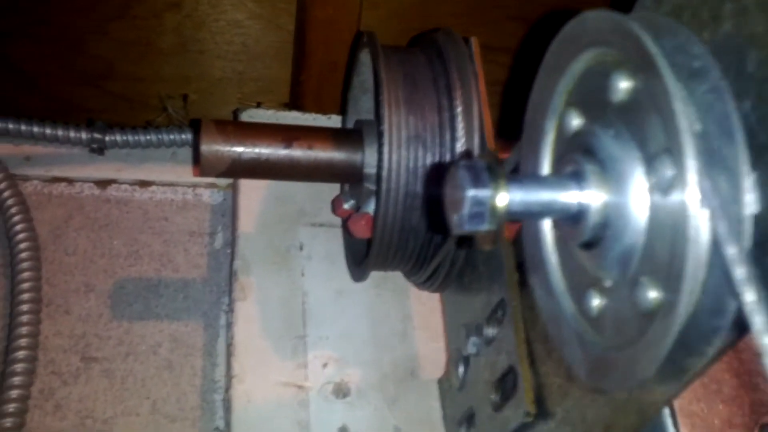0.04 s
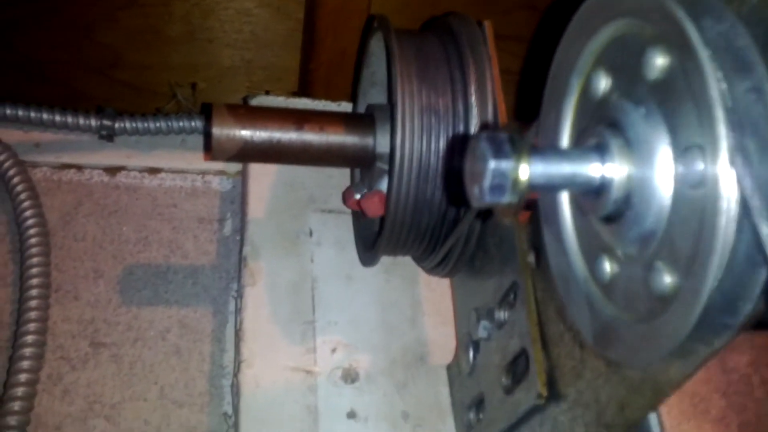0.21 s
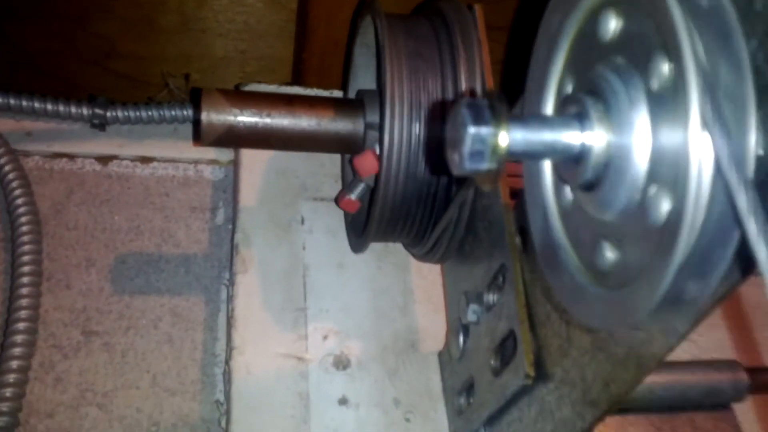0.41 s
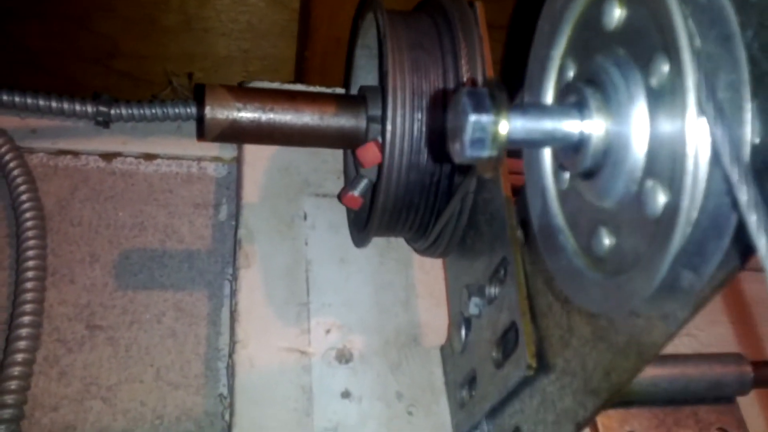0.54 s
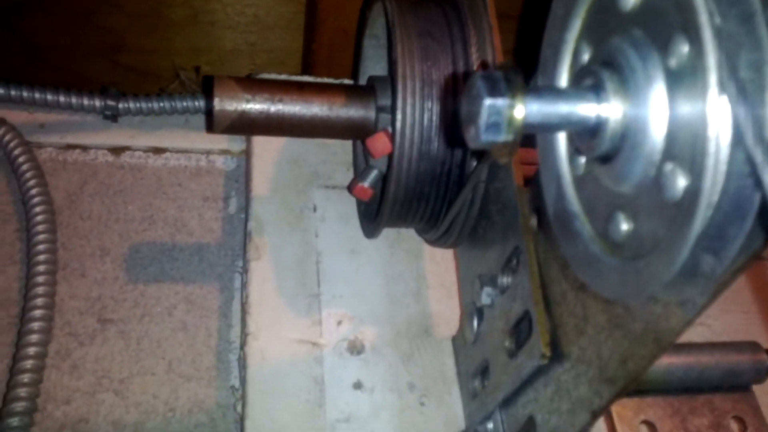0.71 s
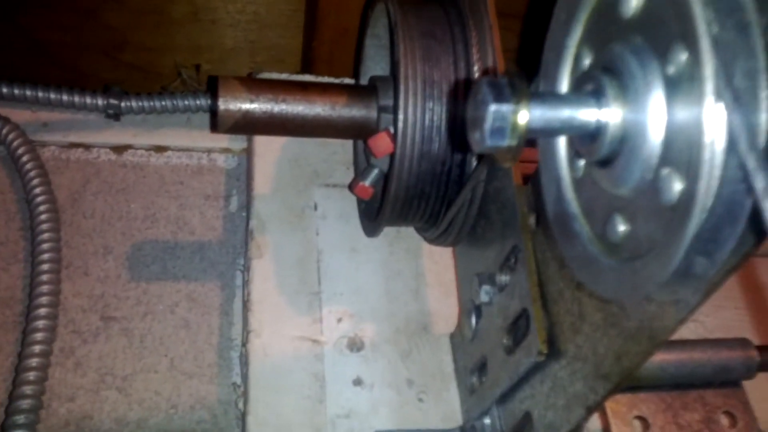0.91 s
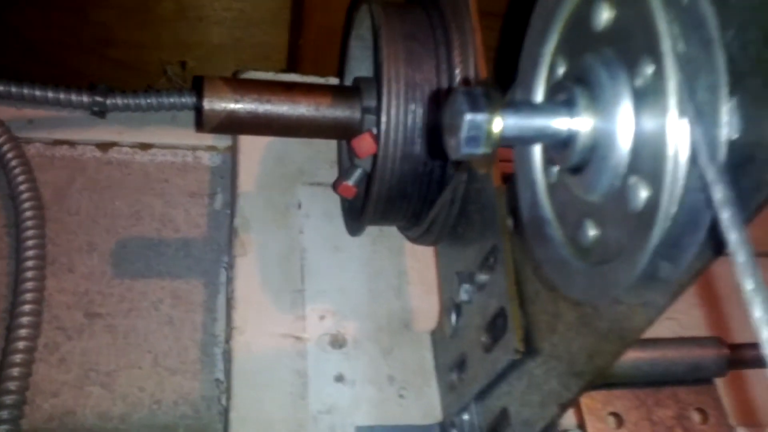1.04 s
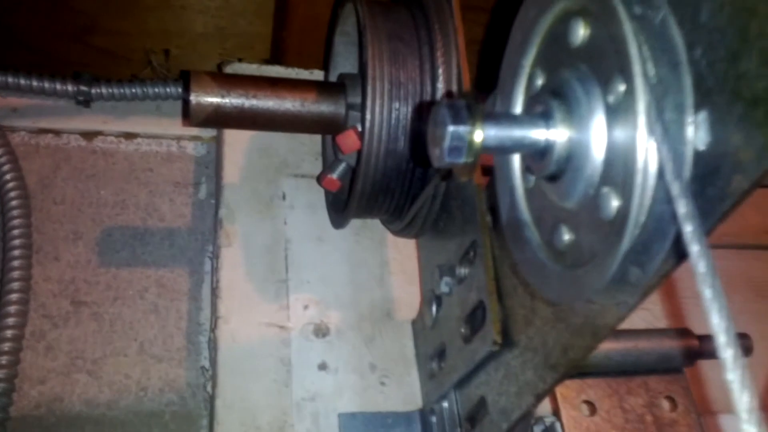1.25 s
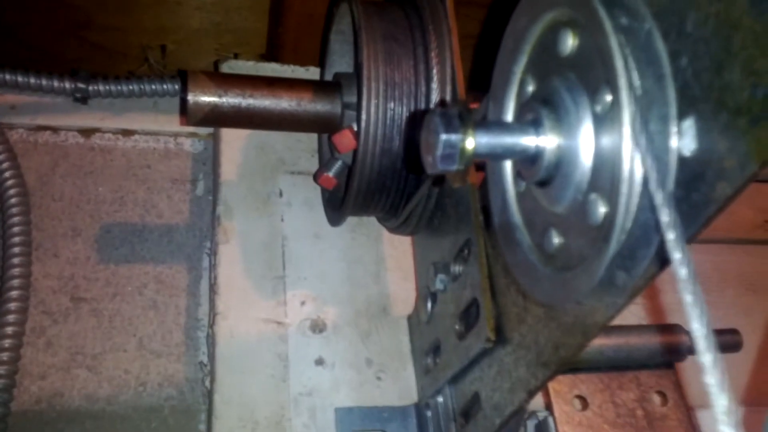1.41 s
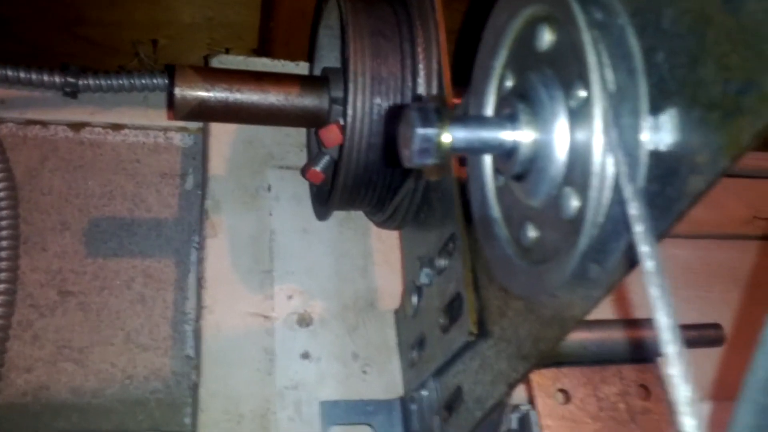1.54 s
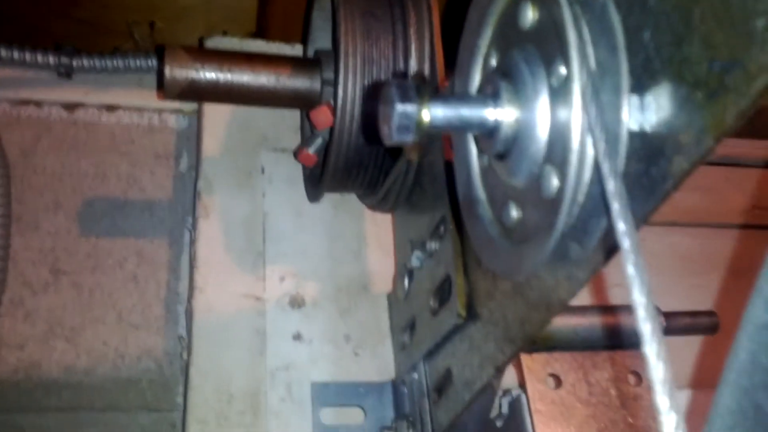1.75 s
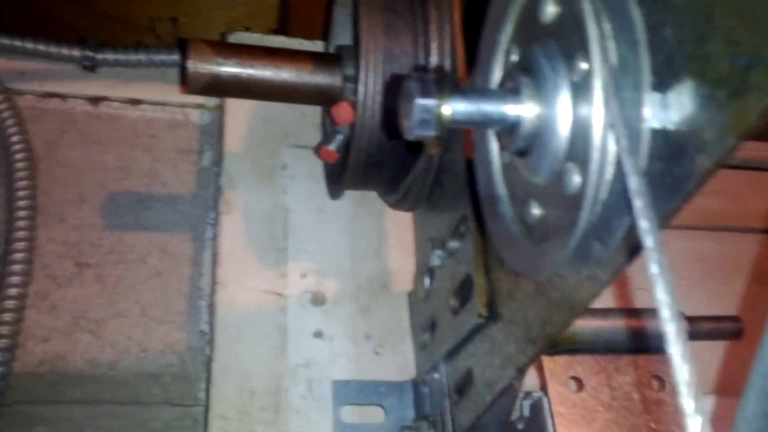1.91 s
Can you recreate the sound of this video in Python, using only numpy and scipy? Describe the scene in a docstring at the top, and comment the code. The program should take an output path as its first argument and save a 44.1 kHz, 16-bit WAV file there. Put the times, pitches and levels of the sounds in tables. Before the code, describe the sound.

Close in a garage, roller knocks and dry clicks lead to a bright steel clang, then a hard door slam with jangling brackets, two quick clanks, a ringing decay and quiet rubbing over faint hiss; loudest hits distort.

```python
"""Roller knocks over low panel rumble and faint hiss: a sectional garage door rolls its last stretch.
Hardware clicks, a steel fitting rings high, the door bangs home, rebounds and clanks; soft scuffs follow.
Rings are shaped noise dying band by band plus clusters of beating partials; clicks are short noise snaps.
Rumble, hiss and scuffs are shaped noise. The loudest peaks overload the microphone and clip."""
import sys
import numpy as np
from scipy import signal
from scipy.fft import rfft, irfft
from scipy.io import wavfile
from scipy.ndimage import uniform_filter1d

SR = 44100
rng = np.random.default_rng(int(sys.argv[2]) if len(sys.argv) > 2 else 0)


def transcribe(u):
    """Save the signal u as a 16-bit wav file named by the first command-line argument.

    u: samples, shape (n,) or (channels, n), limited to [-1, 1]; the rate is SR.
    q: integer samples, one column per channel.
    """
    v = np.clip(np.atleast_2d(u).T, -1, 1)
    q = np.round(v * 32767).astype(np.int16)
    wavfile.write(sys.argv[1], SR, q)


N = 88200

# Colours set spectral shape only; noise() scales them to unit rms.
# ring of door and garage, before stretch: f/Hz, t60/s
GARAGE_T60 = [(60, 1.4), (160, .95), (420, 0.68), (1000, 0.5), (1600, 0.4), (3000, .42), (6000, .37),
              (9000, 0.33), (15000, .25)]

# roller knocks in the track: t/s, level/dB, tilt/(dB/octave), ring stretch/ratio
KNOCKS = [(0.0, -24, 0.5, 1.25), (.175, -40.5, 4.5, 2.8), (.441, -22, 3, 1.9), (.652, -28, 0, .75)]
# track colour: f/Hz, density/(dB per Hz)
TRACK_COLOUR = [(59, -44.5), (100, -13), (192, -11), (482, -20), (660, -1), (764, -10.5), (1460, -7.5),
                (1880, -18), (3920, -30), (5040, -25.5), (7670, -42), (11400, -39.5), (15000, -55.5)]
# track resonances: f/Hz, level/dB
TRACK_MODES = [(655, -17), (886, -14), (955, -13), (1250, -19.5), (1395, -15), (1510, -18), (1680, -19)]
KNOCK_RISE_S = 0.0011
MODE_SPREAD = 0.011  # cluster half-width relative to pitch

# shaking of the door panels: t/s, level/dB
RUMBLE_LEVEL = [(0, -41), (.24, -40), (.275, -25), (0.419, -29), (.48, -22), (.64, -26), (.76, -34.5),
                (.88, -36), (1.0, -45.5), (1.2, -48), (1.5, -55.5), (1.8, -54.5), (2.0, -54)]
# panel colour: f/Hz, density/(dB per Hz)
PANEL_COLOUR = [(4, -20), (18, -3), (28, 0), (45, 5), (65, -0.5), (115, -1.5), (170, -8), (260, -14.5),
                (450, -25.5), (1000, -46), (3000, -80.5)]

# hiss colour: f/Hz, density/(dB per Hz)
HISS_COLOUR = [(60, -1), (150, -3), (300, -8), (600, -17.5), (1200, -14.5), (3200, -23), (7000, -21),
               (9000, -20.5), (11400, -13), (13500, -19), (15500, -22)]
HISS_DB = -59.5

# clicks near the microphone: t/s, level/dB, tilt/(dB/octave), ping f/Hz, ping level/dB, ping t60/s
CLICKS = [(0.1413, -14, -1, 2570, -33.5, 0.054), (0.4401, -12.5, -2.5, 5400, -23, .08),
          (.6502, -18, 0.5, 5250, -25, 0.045), (0.6731, -31, -1.5, 3500, -22.5, 0.042)]
# click colour: f/Hz, density/(dB per Hz)
CLICK_COLOUR = [(300, -27.5), (1500, -22), (2500, -16), (3500, -13), (4600, -19.5), (6000, -0.5),
                (8000, -4.5), (10800, 3), (12500, -10), (15500, -14.5)]
CLICK_T60_S, CLICK_TAIL_DB, CLICK_TAIL_T60_S = 0.016, -16.5, 0.093
PING_SKIRT_DB = -22  # at f/1.2 and 1.5 f

# steel fitting grazed, then struck: t/s, level/dB, rise/s
CLANGS = [(0.2407, -37.5, .002), (0.2449, -3.5, .008)]
# fitting colour: f/Hz, density/(dB per Hz)
FITTING_COLOUR = [(2500, -54), (5000, -34.5), (7200, -26), (7900, -13), (8400, -3), (8900, -10.5),
                  (9900, -15), (10800, -20.5), (13000, -27), (15500, -22.5)]
# dense ring of the fitting: f/Hz, t60/s
FITTING_DECAY = [(4000, .37), (8400, .28), (14000, .23)]
# strongest partials of the fitting: f/Hz, level/dB
FITTING_MODES = [(6918, -24), (8030, -15), (8325, -10), (8393, -1.5), (8465, -4), (8540, -12.5),
                 (8780, -15.5), (8890, -13), (9024, -15), (9378, -18), (10130, -19)]
FITTING_T60_S, FITTING_SPREAD = 0.27, 0.003  # partials; spread is relative to pitch
# jolt that the fitting gives the door: t/s, level/dB, rise/s
JOLT = (.245, -21, 0.00377)
# jolt colour: f/Hz, density/(dB per Hz)
JOLT_COLOUR = [(100, -5.5), (250, 1.5), (340, -3.5), (700, -3.5), (1700, -4), (3000, -15), (6000, -21),
               (15000, -47)]
JOLT_STRETCH = 1.61  # of GARAGE_T60

# door bangs home: t/s, level/dB, rise/s
BANG = (.5125, -9, 0.0023)
# bang colour: f/Hz, density/(dB per Hz)
BANG_COLOUR = [(60, -9), (200, -7.5), (260, 0.5), (340, -6), (440, 0.5), (740, -1.5), (950, 4), (1400, 2),
               (2600, -4), (3700, -2), (6000, -4.5), (8500, -11), (15500, -15.5)]
# dense ring of the bang: f/Hz, t60/s
BANG_DECAY = [(60, 0.51), (300, .6), (1000, .52), (2000, 0.45), (3500, 0.4), (6000, 0.37), (9000, 0.23),
              (15000, 0.26)]
# brackets rung only by the bang: f/Hz, level/dB, t60/s
BRACKET_MODES = [(260.6, -12.5, 0.51), (434, -13.5, .5), (1184, -13, .45), (1986, -17, 0.46),
                 (3620, -17.5, 0.52), (3960, -21, 0.39), (6250, -21, .36)]
# loose hardware jangles: t/s, level/dB, rise/s, ring stretch/ratio
JANGLES = [(.458, -12, 0.011, 0.38), (.490, -15, .008, 1), (0.5126, -4.5, 0.0039, 0.91)]
# hardware colour: f/Hz, density/(dB per Hz)
HARDWARE_COLOUR = [(3000, -45), (8500, -18.5), (9800, -10), (11000, -1.5), (12000, -9), (13300, -13),
                   (14200, -18.5), (16000, -30)]
# hardware resonances: f/Hz, level/dB, t60 before stretch/s
HARDWARE_MODES = [(10920, -15, .23), (11050, -16.5, 0.25), (11170, -15, .21), (11600, -13, 0.25),
                  (12700, -19.5, .19), (13500, -19.5, .17)]
HARDWARE_BASE_T60_S = 0.27  # before stretch

# door rebounds and clanks in its track: t/s, level/dB
CLANKS = [(.652, -23), (.675, -20)]
# clank colour: f/Hz, density/(dB per Hz)
CLANK_COLOUR = [(200, -17), (740, -5.5), (930, 6), (1100, -1), (1500, 5), (2400, -12.5), (3500, -10.5),
                (5200, -18.5), (9000, -23.5), (15500, -42)]
CLANK_RISE_S, CLANK_T60_S, CLANK_ROOM_DB = 0.00049, 0.14, -7.5

# soft scuffs: peak t/s, level/dB, rise sigma/s, fall sigma/s, tilt/(dB/octave)
SCUFFS = [(1.132, -55.5, 0.0071, .014, -4), (1.222, -45.5, 0.031, 0.028, -1),
          (1.533, -48.5, 0.021, 0.038, 1.5), (1.80, -64, .08, 0.11, 0)]
# scuff colour: f/Hz, density/(dB per Hz)
SCUFF_COLOUR = [(200, -5), (450, -9.5), (570, 8.5), (750, -2), (1200, 2.5), (2000, -5.5), (4600, -4.5),
                (6200, -8), (11000, 2), (13500, -1.5), (15500, -15)]
SCUFF_GRAIN_DB, SCUFF_ROOM_DB = 1.5, -6  # grain is the rms swing
# light bumps with the scuffs: t/s, level/dB, f/Hz, t60/s
BUMPS = [(1.175, -48.5, 577, 0.24), (1.492, -47, 299.5, 0.1)]
BUMP_RISE_S = 0.0017

FULL_SCALE = 0.89
EDGE_HZ = 15900


def amp(db):
    """Decibels to gain."""
    return 10 ** (np.asarray(db) / 20)


def evened(x):
    """Scales to an rms of one."""
    return x / np.sqrt(np.mean(x ** 2) + 1e-20)


def read(points, hz):
    """Interpolates a table on a log-frequency axis."""
    f, value = np.transpose(points)
    return np.interp(np.log(hz + 1), np.log(f + 1), value)


def add(mix, start_s, sound):
    """Mixes a sound in at a time."""
    part = mix[max(round(start_s * SR), 0):]
    part += sound[:len(part)]


def clock():
    """Seconds of each sample."""
    return np.arange(N) / SR


def fade(t60_s):
    """Exponential decay, 60 dB per t60."""
    return np.exp(-np.log(1000) * clock() / max(t60_s, 1e-3))


def noise(colour, tilt_db=0):
    """Unit-rms noise with a spectrum and a tilt per octave."""
    hz = np.fft.rfftfreq(N, 1 / SR)
    gain = amp(read(colour, hz) + tilt_db * np.log2(hz + 1))
    return evened(irfft(rfft(rng.standard_normal(N)) * gain, N))


def dying(x, decay, stretch=1, count=14):
    """Dense ring: overlapping bands each die at their own speed."""
    hz = np.fft.rfftfreq(N, 1 / SR)
    centres = np.geomspace(60, 16000, count)
    spectrum = rfft(x)
    out = np.zeros(N)
    for centre, weights in zip(centres, np.eye(count)):
        band = irfft(spectrum * read(np.c_[centres, weights], hz), N)
        out += band * fade(stretch * read(decay, centre))
    return out


def partials(modes, spread, count=4):
    """Decaying modes, each a cluster of close partials that beat; 1 s long."""
    out, t = np.zeros(N), clock()[:SR]
    for hz, db, t60_s in modes:
        cluster = np.zeros(SR)
        for u, phase in rng.random((count, 2)):
            detuned_hz = hz * (1 + spread * (2 * u - 1))
            cluster += np.sin(2 * np.pi * (detuned_hz * t + phase))
        out[:SR] += amp(db) * fade(t60_s)[:SR] * evened(cluster)
    return out


def struck(start_s, db, rise_s, ring):
    """Places a ring in time, with level and linear attack."""
    out = np.zeros(N)
    attack = np.minimum(clock() / max(rise_s, 1e-4), 1)
    add(out, start_s, amp(db) * attack * ring)
    return out


def rollers():
    """Each knock rings the track and the garage."""
    out = np.zeros(N)
    for start_s, db, tilt_db, stretch in KNOCKS:
        modes = [(hz, level, stretch * read(GARAGE_T60, hz)) for hz, level in TRACK_MODES]
        ring = dying(noise(TRACK_COLOUR, tilt_db), GARAGE_T60, stretch)
        ring += partials(modes, 2 * MODE_SPREAD, count=7)
        out += struck(start_s, db, KNOCK_RISE_S, ring)
    return out


def panels():
    """Low rumble of the shaking door: noise under a level curve in dB."""
    return noise(PANEL_COLOUR) * amp(np.interp(clock(), *np.transpose(RUMBLE_LEVEL)))


def hiss():
    """Steady faint noise."""
    return amp(HISS_DB) * noise(HISS_COLOUR)


def clicks():
    """Short dry snaps with a weak tail, each with the ping of a small steel part."""
    out = np.zeros(N)
    shape = fade(CLICK_T60_S) + amp(CLICK_TAIL_DB) * fade(CLICK_TAIL_T60_S)
    for start_s, db, tilt_db, hz, ping_db, ping_t60_s in CLICKS:
        ping_colour = [(hz / 4, -40), (hz / 1.2, PING_SKIRT_DB), (hz, 0),
                       (hz * 1.5, PING_SKIRT_DB), (hz * 4, -40)]
        out += struck(start_s, db, 0, noise(CLICK_COLOUR, tilt_db) * shape)
        out += struck(start_s, ping_db, 0, noise(ping_colour) * fade(ping_t60_s))
    return out


def fitting():
    """Close steel partials beat as they die; the door takes the jolt."""
    out = struck(*JOLT, dying(noise(JOLT_COLOUR), GARAGE_T60, JOLT_STRETCH))
    modes = [(hz, db, FITTING_T60_S) for hz, db in FITTING_MODES]
    for start_s, db, rise_s in CLANGS:
        ring = dying(noise(FITTING_COLOUR), FITTING_DECAY) + partials(modes, FITTING_SPREAD)
        out += struck(start_s, db, rise_s, ring)
    return out


def bang():
    """The door stops hard, ringing its brackets."""
    ring = dying(noise(BANG_COLOUR), BANG_DECAY)
    return struck(*BANG, ring + partials(BRACKET_MODES, MODE_SPREAD, count=6))


def jangles():
    """Loose hardware shakes: high noise and beating modes."""
    out = np.zeros(N)
    for start_s, db, rise_s, stretch in JANGLES:
        modes = [(hz, level, t60_s * stretch) for hz, level, t60_s in HARDWARE_MODES]
        ring = noise(HARDWARE_COLOUR) * fade(HARDWARE_BASE_T60_S * stretch)
        out += struck(start_s, db, rise_s, ring + partials(modes, MODE_SPREAD))
    return out


def clanks():
    """A quick hard contact plus the garage's duller ring."""
    out = np.zeros(N)
    for start_s, db in CLANKS:
        contact = noise(CLANK_COLOUR) * fade(CLANK_T60_S)
        room = amp(CLANK_ROOM_DB) * dying(noise(CLANK_COLOUR, tilt_db=-4), GARAGE_T60)
        out += struck(start_s, db, CLANK_RISE_S, contact + room)
    return out


def scuffs():
    """Grainy rubs that swell and fade, with the garage's ring and light dry bumps."""
    out = np.zeros(N)
    for peak_s, db, rise_s, fall_s, tilt_db in SCUFFS:
        t = clock() - peak_s
        swell = np.exp(-(t / np.where(t < 0, rise_s, fall_s)) ** 2 / 2)
        wander = evened(uniform_filter1d(rng.standard_normal(N), size=90))  # 2 ms mean
        grain = evened(amp(SCUFF_GRAIN_DB * wander))
        out += amp(db) * swell * grain * noise(SCUFF_COLOUR, tilt_db)
    room = dying(noise([(100, -5), (1400, -5.5), (4000, -10), (15000, -11.5)]), GARAGE_T60)
    room /= np.linalg.norm(room)
    out += amp(SCUFF_ROOM_DB) * signal.fftconvolve(out, room)[:N]
    for start_s, db, hz, t60_s in BUMPS:
        bump = noise([(hz / 2, -16), (hz, 0), (hz * 2, -14), (15000, -34)]) * fade(t60_s)
        out += struck(start_s, db, BUMP_RISE_S, bump)
    return out


def scene():
    """All sources at the one microphone."""
    rolling = rollers() + panels() + hiss()
    impacts = clicks() + fitting() + bang() + jangles() + clanks()
    return (rolling + impacts + scuffs())[None]


def record(dry):
    """The loudest peaks overload; then the band limit."""
    clipped = np.clip(dry, -FULL_SCALE, FULL_SCALE)
    lowpass = signal.firwin(511, EDGE_HZ, window=("kaiser", 8), fs=SR)
    return signal.oaconvolve(clipped, lowpass[None], "same")


dry = scene()
out = record(dry)
transcribe(out)
```